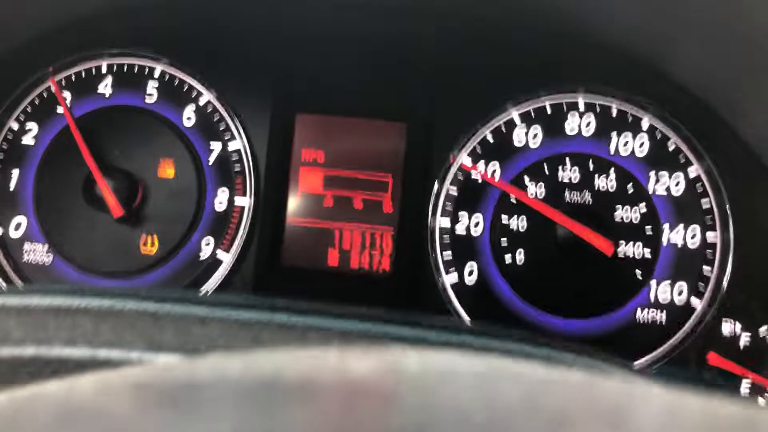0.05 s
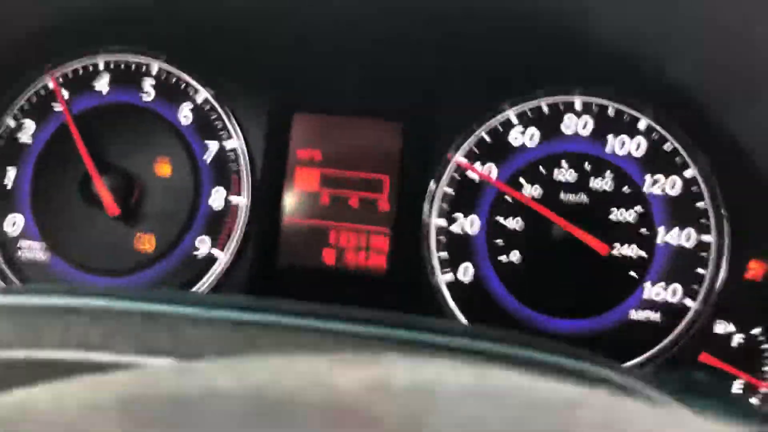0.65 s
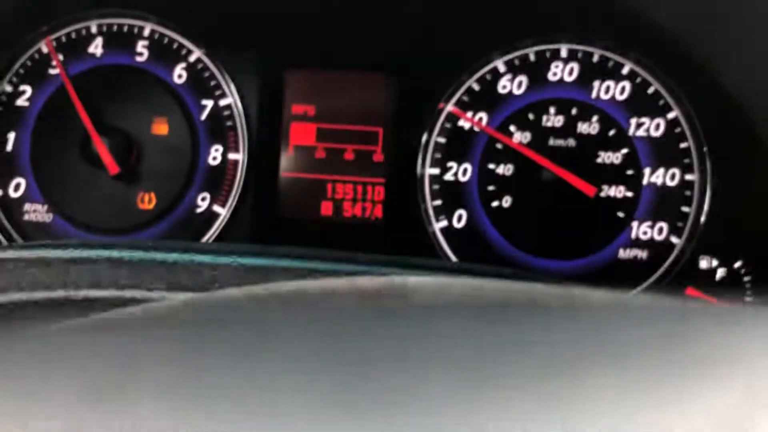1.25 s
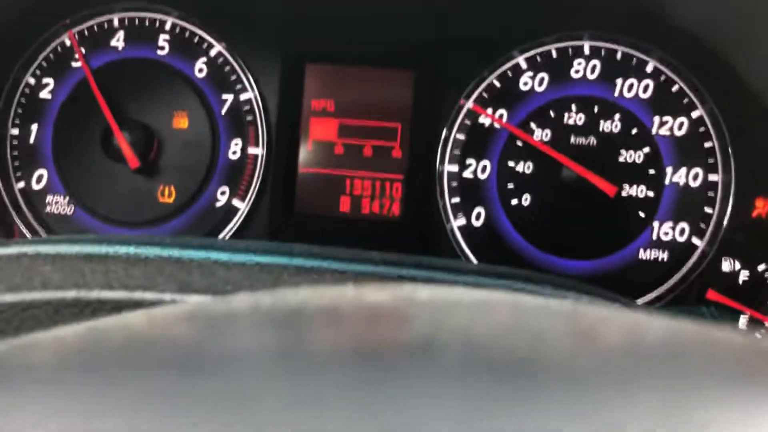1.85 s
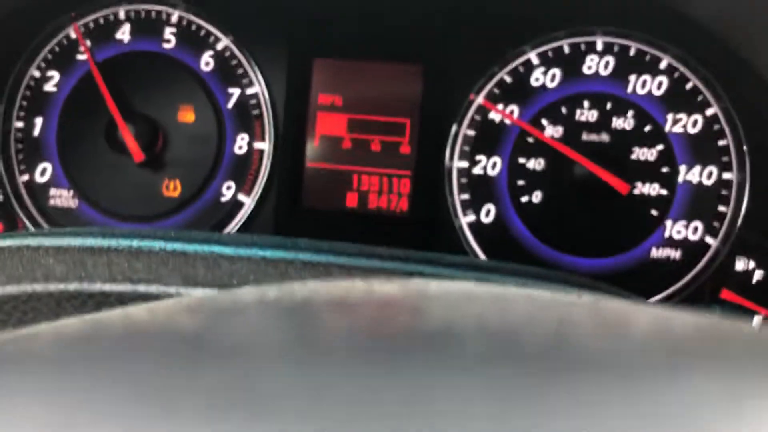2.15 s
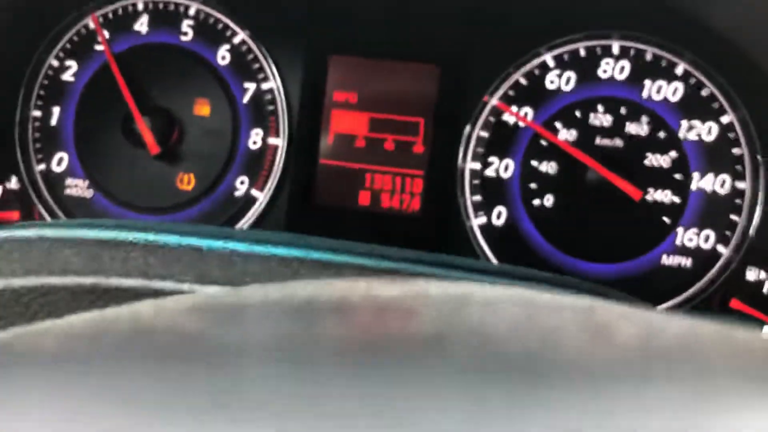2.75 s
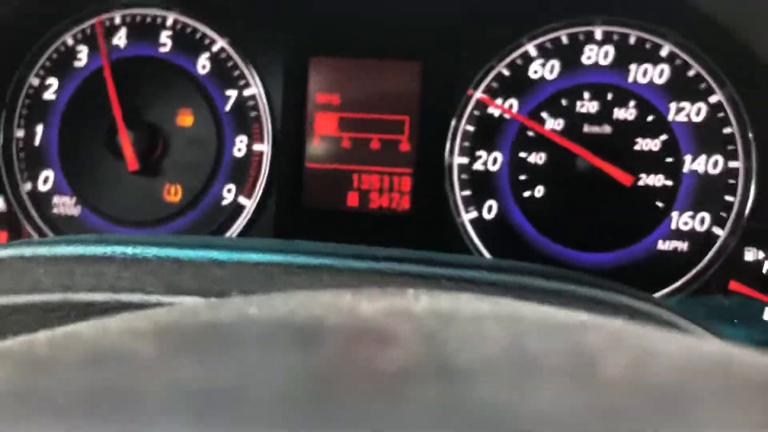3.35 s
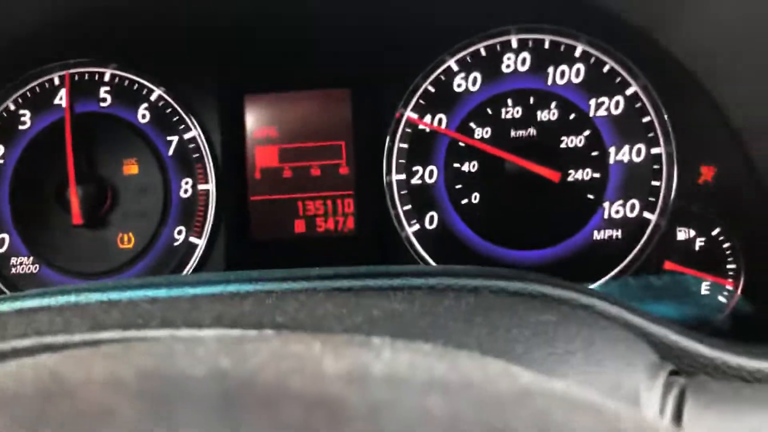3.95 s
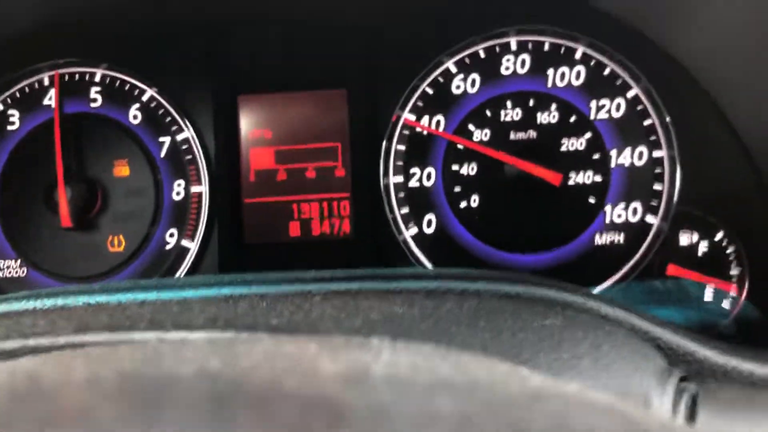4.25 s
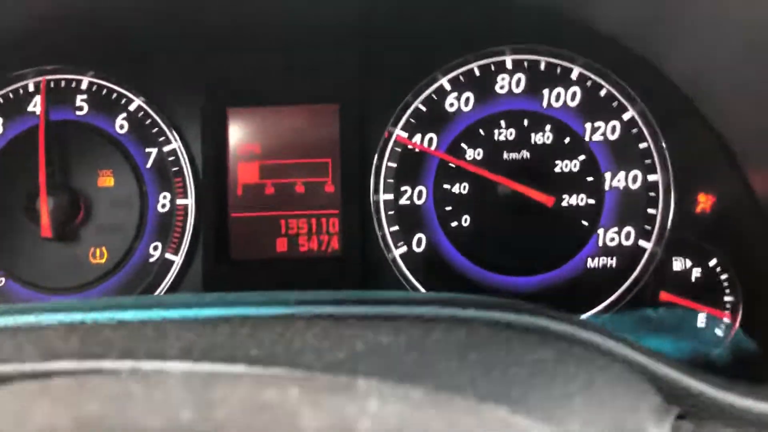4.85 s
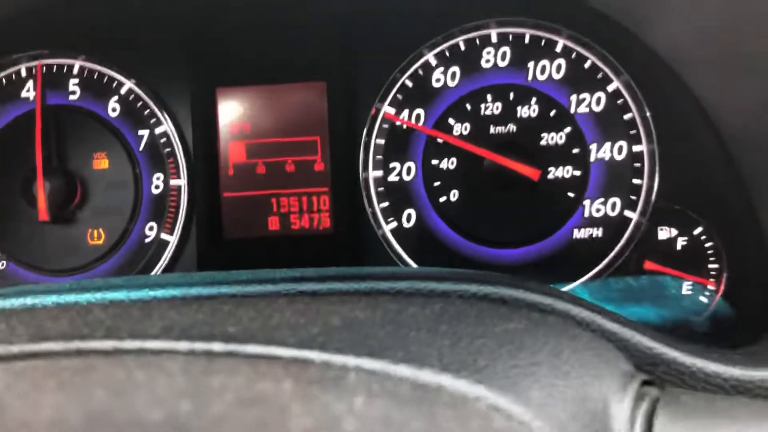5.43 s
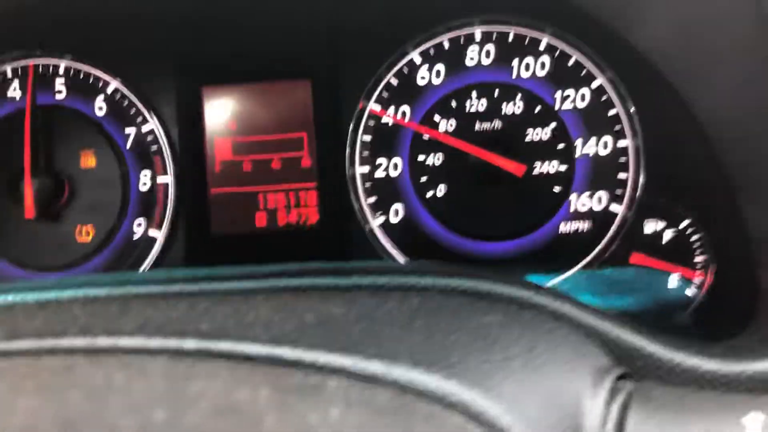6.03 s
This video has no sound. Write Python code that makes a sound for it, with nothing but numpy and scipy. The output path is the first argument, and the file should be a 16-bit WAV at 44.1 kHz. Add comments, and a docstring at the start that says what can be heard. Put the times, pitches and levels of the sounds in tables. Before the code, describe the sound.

A car's raspy exhaust drones in the cabin over road rumble, eases off, barks with a sharp pop, then accelerates harder.

```python
"""Inside a six-cylinder car with a loud, loose exhaust, one microphone at the driver's seat.
The engine drones at a steady speed, eases off, barks and pops through a downshift, then pulls harder
and brighter. Its puffs of gas boom in the cabin, growl in the pipe, rasp through a leak and rattle
a loose joint. Underneath, the road rumbles and thuds; close by, the trim ticks now and then."""
import sys
import numpy as np
from scipy import signal
from scipy.fft import rfft, irfft
from scipy.io import wavfile
from scipy.ndimage import uniform_filter1d, map_coordinates

SR = 44100
rng = np.random.default_rng(int(sys.argv[2]) if len(sys.argv) > 2 else 0)


def generate_wav(signal):
    """Clip the signal to [-1, 1] and save it as 16-bit WAV at the path in sys.argv[1]."""
    frames = np.transpose(np.atleast_2d(signal))
    scaled = np.clip(frames, -1, 1) * 32767
    pcm = np.round(scaled).astype(np.int16)
    wavfile.write(sys.argv[1], SR, pcm)


N = 268569
T = np.arange(N) / SR
HZ = np.fft.rfftfreq(N, 1 / SR)

# Road rumble through the floor. Each row: time in seconds, level in dB.
RUMBLE_LEVEL = [(.12, -40), (.55, -32), (1.4, -38), (1.95, -43), (2.7, -30), (4.1, -34.5), (4.55, -28),
                (6.08, -23.5)]
# Wheels dropping into hollows. Each row: time of the peak in seconds, level in dB.
HOLLOWS = [(.375, -20), (0.536, -15), (.755, -14.5), (1.688, -24), (3.83, -21), (4.84, -16)]
# Trim near the seat. Each row: start in seconds, level in dB, relative level of the ring in dB.
TRIM_TICKS = [(0.9423, -24, -23), (1.3665, -37, -7.5), (1.6676, -36, -15), (1.944, -38, 2),
              (2.051, -43, -2), (2.075, -40.5, -5), (2.6002, -44.5, 2.5), (2.7144, -36, -13)]
# Ring of the trim. Each row: pitch in Hz, relative level in dB, t60 in seconds.
TRIM_MODES = [(3200, 2.5, 0.061), (3340, 0, 0.031), (6578, -27, .04)]
# The two stages of the pop's decay. Each row: level in dB, t60 in seconds.
POP_STAGES = [(-17.5, 0.085), (-25, 0.42)]

# Noise colours as heard from the seat. Each row: frequency in Hz, relative spectral level in dB.
RUMBLE_COLOUR = [(15, -28), (30, -23), (42, -19), (54, 0), (64, 7.5), (78, -4), (105, -6), (160, -26),
                 (400, -65)]
TYRE_AND_AIR_COLOUR = [(20, -21), (60, -0.5), (95, -4.5), (130, 1.5), (200, -5.5), (350, -8), (600, -24),
                       (1000, -18.5), (2000, -32), (4000, -46.5), (8000, -54.5), (16000, -64)]
SNAP_COLOUR = [(1500, -29), (3000, -3.5), (4300, 4.5), (6500, -6.5), (11000, -7.5), (16000, -16)]
CRACK_COLOUR = [(200, -9.5), (700, 9), (1500, -4.5), (1900, -7), (2400, -2), (3100, -3), (3800, -12),
                (5200, -14), (7500, -24.5), (16000, -29)]
RATTLE_COLOUR = [(2500, -24), (3700, -5), (4500, -3.5), (5400, -8), (5900, -12), (7000, -16),
                 (10000, -39.5)]
FIZZ_COLOUR = [(4500, -23), (6200, -4), (7500, -0.5), (10000, -0.5), (13000, -5.5), (16000, -8.5)]
RASP_COLOUR = [(650, -41.5), (850, -8), (980, 1.5), (1150, -4.5), (1280, 0.5), (1550, -1), (1800, -4.5),
               (2300, -2.5), (2620, -2), (3100, -7.5), (3450, -7), (3800, -28.5), (6000, -54.5)]
BURBLE_COLOUR = [(55, -17.5), (88, 14.5), (118, 5), (200, 0), (290, 15), (400, -3.5), (470, 1.5),
                 (560, 4.5), (650, -1.5), (780, 3.5), (960, -11.5), (1150, -16), (1800, -52)]
# Resonances. Each row: centre in Hz, width in Hz, lift in dB.
PIPE_MODES = [(1570, 210, 4.5), (2082, 94, 8), (2910, 240, 5), (4190, 280, 10), (4870, 130, 6.5),
              (6940, 400, 3.5)]
BARK_MODES = [(720, 170, 7), (925, 160, 5), (1440, 280, 10), (2250, 180, 3), (3014, 460, 11),
              (5310, 130, 11), (10000, 3800, 1)]  # the pipe with the throttle snapped open
CABIN_MODES = [(188, 16, -7.5), (307.4, 9.6, 4), (385, 9.2, 9), (422.5, 11, 9.5)]  # standing waves that the low orders sweep through

# Engine speed. Each row: time in seconds, firing rate in Hz.
FIRING_RATE = [(0.15, 150.1), (0.7, 151.2), (1.35, 154.6), (2.6, 151.8), (2.87, 150.4), (2.96, 181),
               (3.02, 190.4), (3.16, 189.3), (3.35, 161.3), (3.6, 184.7), (3.9, 207.8), (4.2, 206),
               (4.43, 210), (4.56, 206.5), (4.7, 211.5), (4.85, 208.6), (5.0, 210.7), (5.4, 211.9),
               (6.09, 219.8)]
# Smooth under load, ragged off the throttle. Each row: time in seconds, roughness from 0 to 1.
ROUGHNESS = [(.12, 0.3), (1.55, 0.24), (1.8, 0.8), (2.8, 0.85), (2.93, 0.39), (3.2, 0.93), (4.28, 0.82),
             (4.48, 0.34), (6.08, 0.17)]
# Exhaust flow as the pedal moves. Each row: time in seconds, growl and rasp in relative dB.
PEDAL_FLOW = [(.12, -28, -35), (.5, -28, -37.5), (1.45, -34.5, -41.5), (1.75, -44, -59), (2.25, -43, -47.5),
              (2.8, -35.5, -45), (3.15, -25, -41), (3.6, -27.5, -40.5), (4.25, -32.5, -39.5),
              (4.65, -28.5, -38.5), (4.95, -26.5, -34.5), (5.2, -21.5, -29), (5.7, -22, -24),
              (6.08, -22.5, -23)]
# The throttle blip. Each row: time in seconds, share of bark from 0 to 1.
BARK_SHARE = [(2.8, 0.04), (2.89, 1), (3.1, 1), (3.45, 0.02)]
# Surges of gas, the strongest at the blip. Each row: time of full strength in seconds,
# rise in dB per second, hold in seconds, rasp in relative dB.
GAS_SURGES = [(2.599, 150, 0.023, -45.5), (2.905, 1000, 0.12, -15.5), (3.225, 394, .015, -33.5),
              (3.538, 191, 0.054, -34), (4.02, 128, 0.11, -37), (4.46, 127, 0.024, -30.5),
              (4.73, 151, .03, -35)]
# Strength of each cylinder in relative dB, in firing order: in the pipe, and at the loose joint.
PIPE_PUFFS_DB = [5, 1, 1.5, -1.8, -1.7, 2.2]
JOINT_KNOCKS_DB = [-3, -6, -1, 1.5, -3.5, -10.5]
# Upper orders, cruising and pulling. Each row: multiple of the engine cycle, relative level in dB.
CRUISE_ORDERS = [(9, -25), (10, -43), (11, -31.5), (13, -35), (14, -43), (16, -47.5), (17, -44), (18, -25),
                 (19, -29.5), (20, -47), (21, -32.5), (22, -44), (23, -35), (24, -32), (25, -32),
                 (26, -39.5), (27, -34), (28, -46), (29, -36), (30, -21.5), (31, -31.5), (32, -38.5),
                 (33, -46.5), (34, -41), (35, -33), (36, -35), (37, -37.5), (39, -32), (40, -49.5)]
PULL_ORDERS = [(9, -13.5), (10, -27), (11, -16), (13, -11), (14, -21), (16, -25.5), (17, -28.5),
               (18, -10.5), (19, -18), (20, -24.5), (21, -20), (22, -31), (23, -15), (24, -18), (25, -23),
               (26, -31.5), (27, -22.5), (28, -45), (29, -24.5), (30, -35), (31, -35.5), (32, -44),
               (33, -39.5), (34, -33.5), (35, -30), (36, -23), (37, -42.5), (39, -29), (40, -21)]
# Low orders from unequal cylinders. Each row: multiple of the cycle, then in dB the level in top gear,
# between gears and in the lower gear, and the change at full load.
LOW_ORDERS = [(3, -42, -25, -44.5, 7), (4, -40.5, -38, -23.5, -0.5), (5, -41.5, -17.5, -30.5, 4.5),
              (7, -52.5, -34, -42.5, 18), (8, -37, -31, -30.5, -12), (12, -48.5, -35.5, -45, 18),
              (15, -55.5, -56.5, -50, 18)]
# Hum at the firing rate. Each row: time in seconds, rms level in dB.
DRONE_LEVEL = [(.12, -11.5), (1.4, -12.5), (1.85, -19), (2.2, -17), (2.86, -15), (2.92, -8), (3.08, -19.5),
               (3.65, -23.5), (3.82, -14), (3.95, -22.5), (4.2, -16.5), (4.4, -20), (5.15, -20),
               (5.8, -11.5), (6.08, -9)]

CYLINDERS = 6
THROB_AT = 0.58  # share of the cycle at which the boom crests and the rasp is brightest
OPEN_S = 0.119  # the microphone opens
USUAL_RASP_DB = -35.5  # reference flow for the rattle and the leak's edge


def amp(db):
    """Decibels to gain."""
    return 10 ** (np.asarray(db) / 20)


def unit(x):
    """Scales to rms 1."""
    return x / np.sqrt(np.mean(x ** 2) + 1e-20)


def together(*levels_db):
    """Level of unrelated sounds heard at once."""
    return 10 * np.log10(sum(amp(db) ** 2 for db in levels_db) + 1e-20)


def curve(rows):
    """Each column of a time table, joined by straight lines."""
    s, *columns = np.transpose(rows)
    return [np.interp(T, s, c) for c in columns]


def lift_db(hz, modes):
    """Lift that resonances give at these frequencies."""
    return sum(lift / (1 + (2 * (hz - centre) / width) ** 2) for centre, width, lift in modes)


def colour(x, points, modes=()):
    """Filters by a spectrum with resonances on top, to rms 1."""
    hz, db = np.transpose(points)
    db = np.interp(np.log(HZ + 1), np.log(hz), db) + lift_db(HZ, modes)
    return unit(irfft(rfft(x) * amp(db), N))


def noise():
    """White noise."""
    return rng.standard_normal(N)


def wander(rate_hz):
    """Slow random drift of rms 1."""
    return unit(irfft(rfft(noise()) * np.exp(-(HZ / rate_hz) ** 2), N))


def road():
    """Bumps rumble up through the body over steady tyre and air noise."""
    rumble = colour(noise(), RUMBLE_COLOUR)
    rumble /= np.sqrt(uniform_filter1d(rumble ** 2, size=5000) + 1e-6)  # the bumps alone set its swell
    return amp(curve(RUMBLE_LEVEL)[0]) * rumble + amp(-30.5) * colour(noise(), TYRE_AND_AIR_COLOUR)


def thuds(ring_hz=59.4, swell_s=0.05):
    """Each hollow swells the lowest air resonance of the cabin for a few cycles."""
    return sum(amp(db) * np.exp(-((T - s) / swell_s) ** 2) * np.cos(2 * np.pi * ring_hz * (T - s))
               for s, db in HOLLOWS)


def trim_ticks(snap_t60=0.035):
    """Short plastic snaps near the microphone, some with a small ring."""
    out, t = np.zeros(N), T[:SR // 8]
    snap = colour(noise(), SNAP_COLOUR)
    ring = sum(amp(db - 60 * t / t60) * np.sin(2 * np.pi * hz * t) for hz, db, t60 in TRIM_MODES)
    for s, db, ring_db in TRIM_TICKS:
        span = slice(round(s * SR), round(s * SR) + len(t))
        crack = snap[span] * amp(-11.5 - 60 * t / snap_t60)
        out[span] += amp(db) * (crack + amp(ring_db - 3) * ring)
    return out


def pop(start_s=3.307, thump_hz=131.7, thump_t60=0.18):
    """Unburnt fuel cracks in the pipe, thumps the cabin and hisses away."""
    age = np.maximum(T - start_s, 0)
    fade = sum(amp(db - 60 * age / t60) for db, t60 in POP_STAGES)
    crack = fade * (1 - np.exp(-age / 0.00063)) * colour(noise(), CRACK_COLOUR)
    thump = amp(-2 - 60 * age / thump_t60) * (1 - np.exp(-age / 0.0087))
    return crack + thump * np.sin(2 * np.pi * thump_hz * age)


def lower_gear(firing_hz, above_hz=190.5, span_hz=9.4):
    """Share 0-1 by which the lower gear has engaged."""
    return np.clip((firing_hz - above_hz) / span_hz, 0, 1)


def surges(t, fall_db_per_s=161.5):
    """Level of the gas surges at times t: each swells, holds and falls away."""
    return together(*(db - rise * np.maximum(s - t, 0) - fall_db_per_s * np.maximum(t - s - hold, 0)
                      for s, rise, hold, db in GAS_SURGES))


def flow_levels(firing_hz, growl_lead_s=0.014, settle_s=0.28):
    """Levels of growl, rasp, the leak's edge and rattle: the pedal sets the flow, surges ride on it."""
    growl_db, steady_db = curve(PEDAL_FLOW)
    surge_db = surges(T)
    growl_db = together(growl_db, -4.5 + 0.84 * surges(T + growl_lead_s))
    excess_db = steady_db - USUAL_RASP_DB
    edge_db = -5 + 0.29 * excess_db + 3 * lower_gear(firing_hz) + 5 * curve(BARK_SHARE)[0] ** 2
    settling_db = 7.5 * np.exp(-(T - OPEN_S) / settle_s)  # the joint shakes harder at first
    rattle_db = together(-53 + 1.466 * excess_db + settling_db, -54 + 1.33 * (surge_db - USUAL_RASP_DB))
    return growl_db, together(steady_db, surge_db), edge_db, rattle_db


def puffs(cycles, cylinders_db, rough, decay_firings, floor):
    """A puff of gas at each firing: part repeats every cycle and drifts, part is fresh turbulence."""
    firings = cycles * CYLINDERS
    uneven = 1 - 0.63 * curve(BARK_SHARE)[0]  # in the blip the cylinders hit more alike
    strength = amp(uneven * np.array(cylinders_db)[firings.astype(int) % CYLINDERS])
    envelope = strength * np.exp(-(firings % 1) / decay_firings) + floor
    first, second = (unit(map_coordinates(grain, [cycles % 1 * len(grain)], order=3, mode="grid-wrap"))
                     for grain in rng.standard_normal(size=(2, 1200)))
    drift = 2.168 * T + 0.35 * wander(2.3)
    repeated = np.cos(drift) * first + np.sin(drift) * second
    rough = np.clip(rough, 0, 1)
    return envelope * (np.sqrt(1 - rough ** 2) * repeated + rough * noise())


def through_pipe(x, points):
    """Colours a sound with the pipe's ring, which turns to a bark during the throttle blip."""
    bark, = curve(BARK_SHARE)
    return np.sqrt(1 - bark) * colour(x, points, PIPE_MODES) + np.sqrt(bark) * colour(x, points, BARK_MODES)


def reflections(x, t60, wet_db):
    """Close walls smear each puff for a few milliseconds, without favouring any pitch."""
    t = T[:SR // 25]
    fade = amp(-60 * t / t60)
    spectrum = rfft(rng.standard_normal(len(t)) * fade)
    tail = irfft(spectrum / (abs(spectrum) + 1e-12), len(t)) * np.sqrt(fade)
    return x + amp(wet_db) * signal.oaconvolve(x, tail / np.linalg.norm(tail))[:N]


def joint_rattle(cycles, rough, level_db):
    """The loose joint buzzes hardest once a cycle, and fizzes when it is driven hard."""
    buzz = puffs(cycles, JOINT_KNOCKS_DB, 0.48 + rough, decay_firings=1, floor=0.24)
    buzz *= amp(0.78 * wander(50) + 0.58 * wander(4.9))
    fizz_db = level_db - 8 + 0.34 * (level_db + 29)
    fizz = amp(fizz_db) * through_pipe(buzz, FIZZ_COLOUR)
    return amp(level_db) * through_pipe(buzz, RATTLE_COLOUR) + fizz


def leak_rasp(cycles, rough, level_db, edge_db, split_hz=1850):
    """Sharp puffs from the leak ring the pipe; more load sharpens their edge."""
    leak = puffs(cycles, PIPE_PUFFS_DB, rough, decay_firings=0.55, floor=0.32)
    leak = reflections(leak, t60=0.026, wet_db=-5)
    spectrum = rfft(through_pipe(leak, RASP_COLOUR))
    body = irfft(spectrum / (1 + (HZ / split_hz) ** 8), N)
    edge = irfft(spectrum / (1 + (split_hz / (HZ + 1)) ** 8), N)
    # the rasp brightens once a cycle, with the joint's hardest knock
    brightening = np.exp(-((cycles % 1 - THROB_AT) / 0.14) ** 2)
    edge *= 0.75 + 1.35 * (1 - rough) * brightening
    return amp(level_db + 0.9) * (body + amp(edge_db) * edge)


def order_tone(cycles, order, flutter, peak_at):
    """One multiple of the engine cycle, cresting at peak_at, unsteady in strength and phase."""
    angle = 2 * np.pi * order * (cycles - peak_at)
    in_phase = np.cos(angle) * (1 + flutter * wander(11))
    return np.sqrt(2) * (in_phase + np.sin(angle) * flutter * wander(17))


def pipe_growl(cycles, firing_hz, rough, level_db):
    """Unequal cylinders give a comb of upper orders that blurs into burble off the throttle."""
    pull = np.clip((firing_hz - 160) / 45, 0, 1)
    comb = np.zeros(N)
    for (order, cruise_db), (_, pull_db) in zip(CRUISE_ORDERS, PULL_ORDERS):
        db = (1 - pull) * (cruise_db + 18.5) + pull * (pull_db + 7.5)
        comb += amp(db) * order_tone(cycles, order, 0.58 * rough, rng.random())
    burble = colour(puffs(cycles, PIPE_PUFFS_DB, 0.99, decay_firings=0.55, floor=0.6), BURBLE_COLOUR)
    return amp(level_db) * ((1 - rough ** 2) * comb + rough ** 1.16 * amp(4) * burble)


def cabin_boom(cycles, firing_hz, rough, shift_s=2.79, shift_takes_s=0.21, lag_cycles=0.0065):
    """Low orders crest nearly together and throb once a cycle; gear and load set their balance."""
    shifted = np.clip((T - shift_s) / shift_takes_s, 0, 1)
    lower = lower_gear(firing_hz)
    out = amp(curve(DRONE_LEVEL)[0]) * order_tone(cycles, CYLINDERS, 0.09 * rough, THROB_AT)
    for order, top_db, between_db, lower_db, load_db in LOW_ORDERS:
        gear_db = (1 - shifted) * top_db + shifted * ((1 - lower) * between_db + lower * lower_db)
        db = gear_db + load_db * (1 - rough) + lift_db(order * firing_hz / CYLINDERS, CABIN_MODES)
        peak_at = THROB_AT + lag_cycles * (order - CYLINDERS)  # higher orders reach the seat later
        out += amp(db) * order_tone(cycles, order, 0.41 * rough, peak_at)
    return out


def scene():
    """At the driver's seat, in mono: one crankshaft drives boom, growl, rasp and rattle over the road."""
    firing_hz, = curve(FIRING_RATE)
    rough, = curve(ROUGHNESS)
    cycles = np.cumsum(firing_hz * (1 + 0.002983 * rough * wander(14))) / SR / CYLINDERS
    growl_db, rasp_db, edge_db, rattle_db = flow_levels(firing_hz)
    exhaust = cabin_boom(cycles, firing_hz, rough) + pipe_growl(cycles, firing_hz, rough, growl_db)
    exhaust += leak_rasp(cycles, rough, rasp_db, edge_db) + joint_rattle(cycles, rough, rattle_db)
    return (exhaust + road() + thuds() + trim_ticks() + pop())[None]


def record(dry, cutoff_hz=15850):
    """The microphone input opens after a moment, rounds off the highest peaks and is band-limited."""
    opened = dry * np.clip((T - OPEN_S) / 0.00063, 0, 1)
    limited = opened / (1 + opened ** 8) ** (1 / 8)
    lowpass = signal.firwin(511, cutoff_hz, window=("kaiser", 9), fs=SR)
    return signal.oaconvolve(limited, lowpass[None], "same")


dry = scene()
out = record(dry)
generate_wav(out)
```